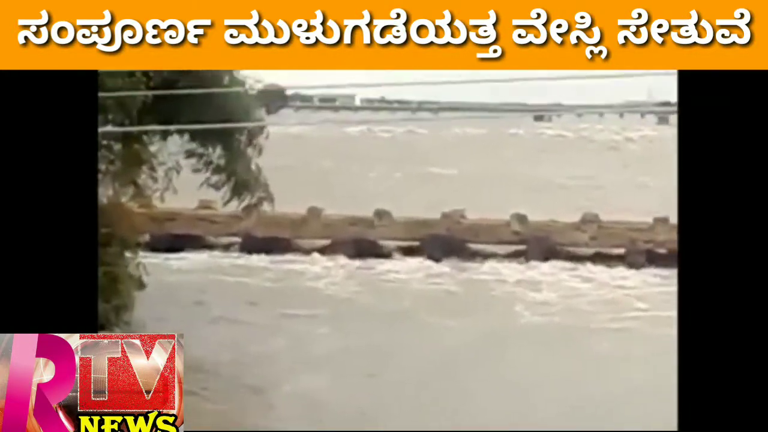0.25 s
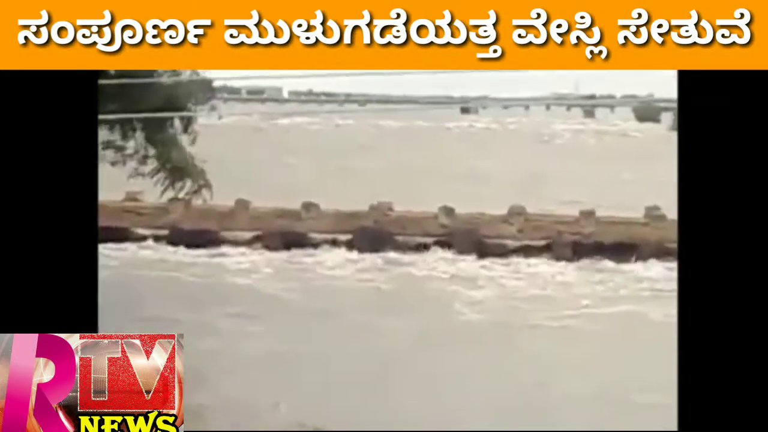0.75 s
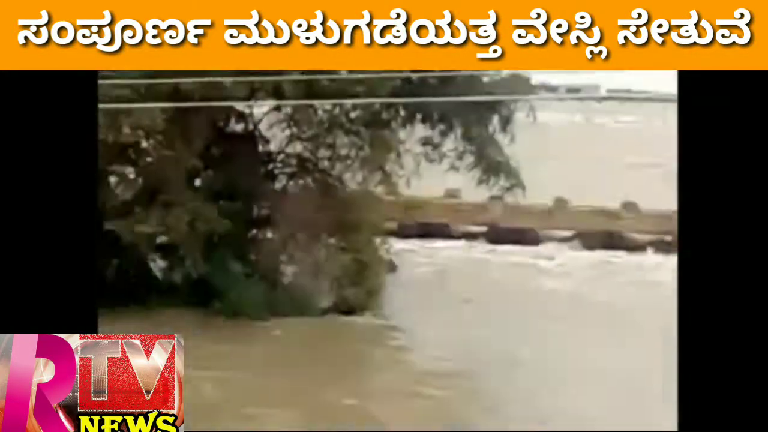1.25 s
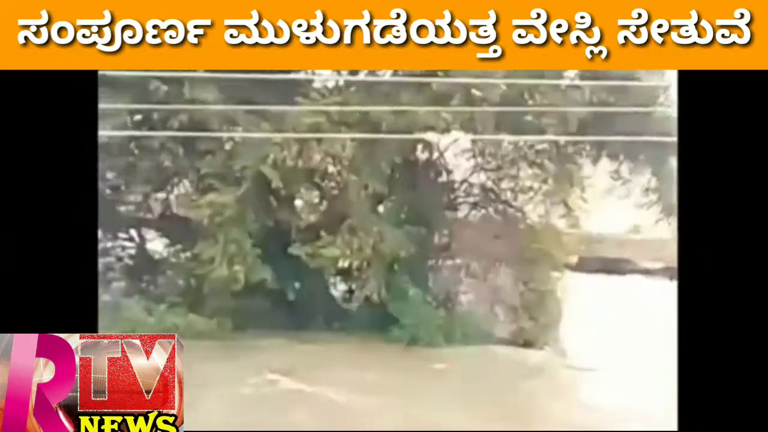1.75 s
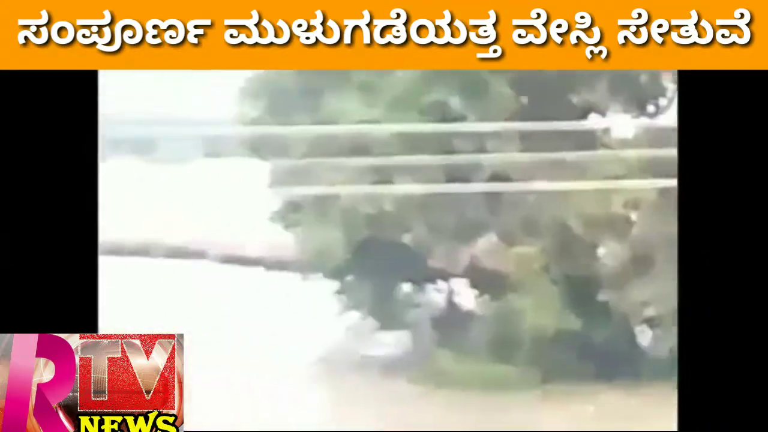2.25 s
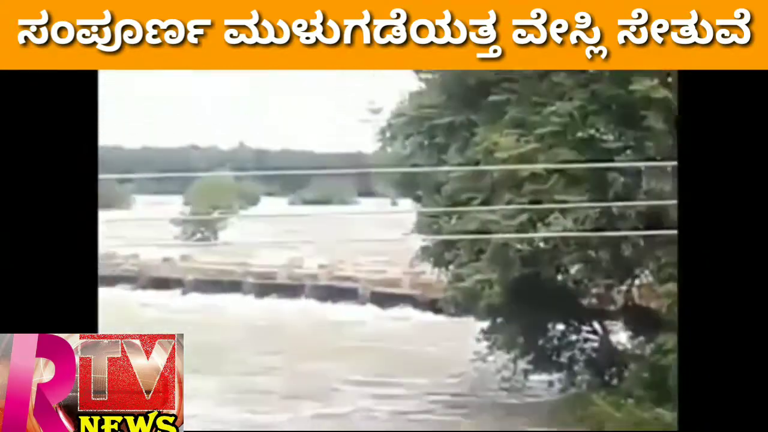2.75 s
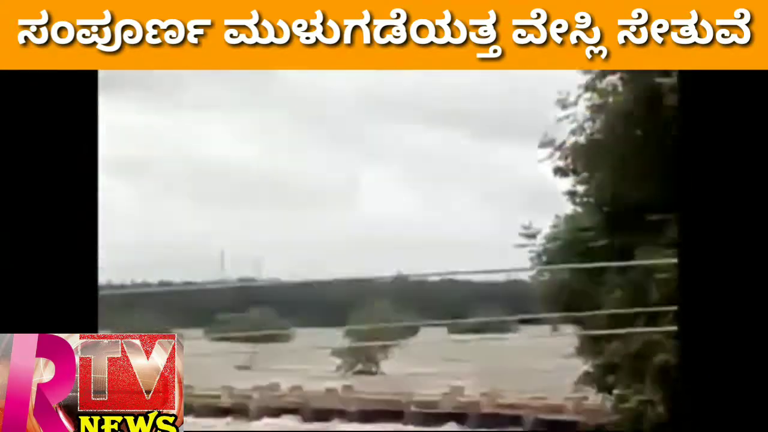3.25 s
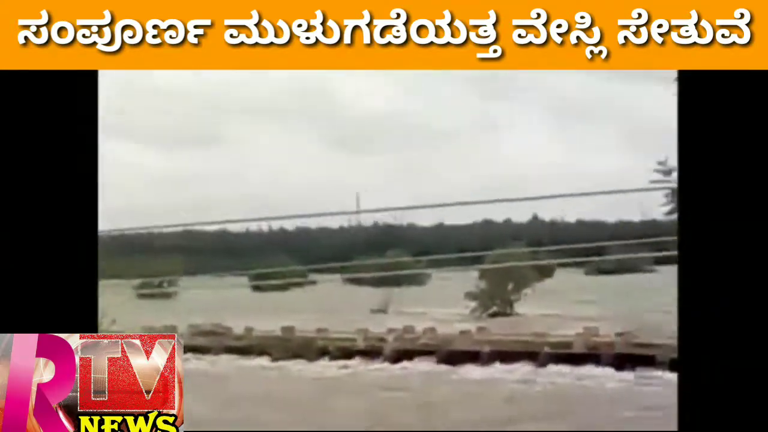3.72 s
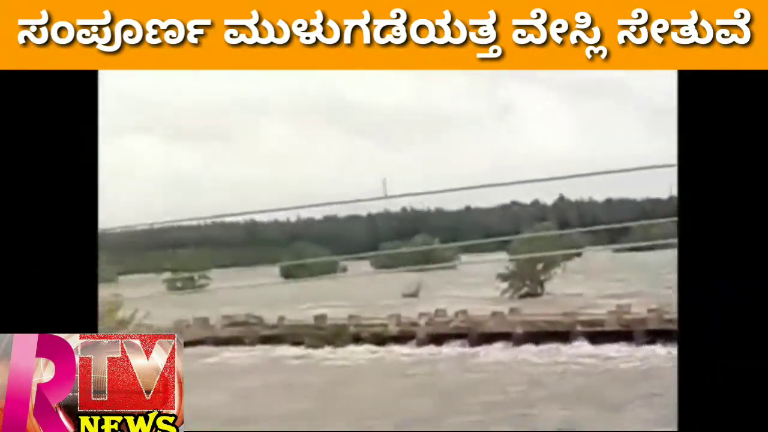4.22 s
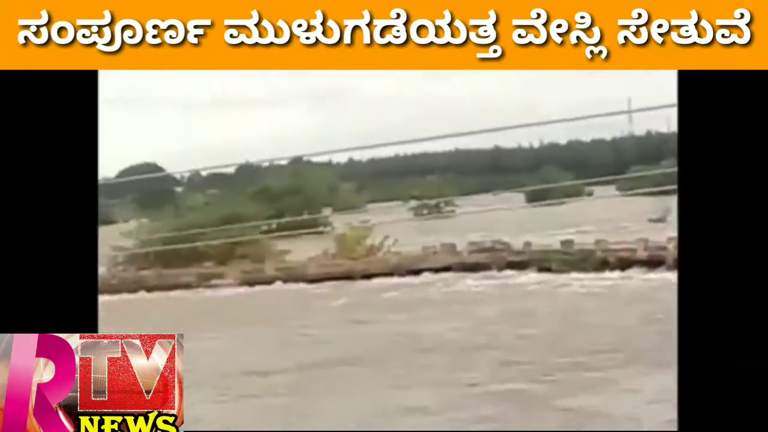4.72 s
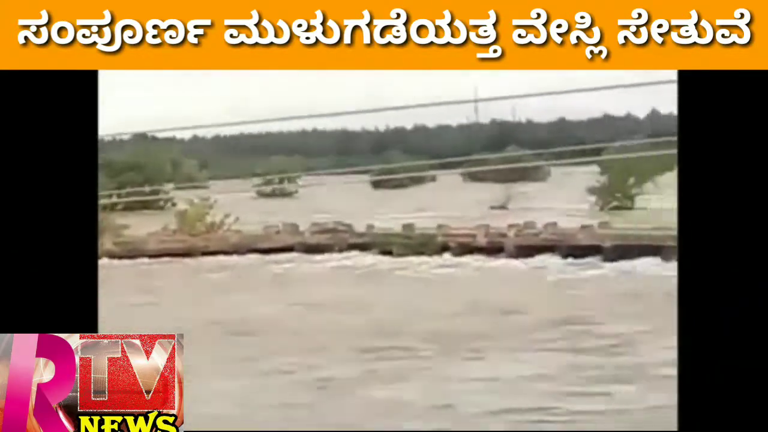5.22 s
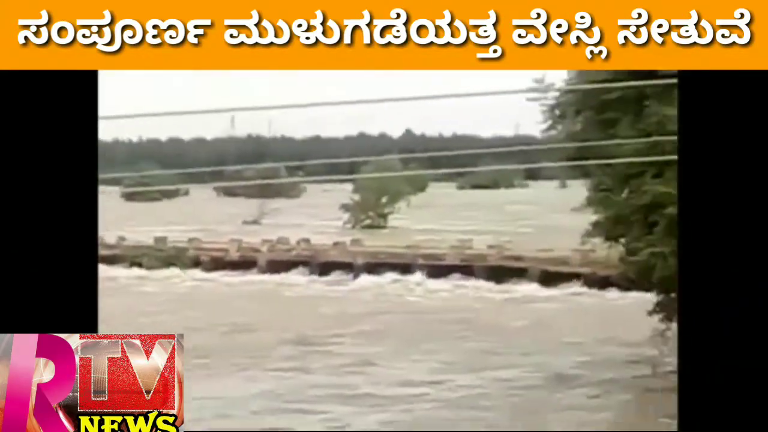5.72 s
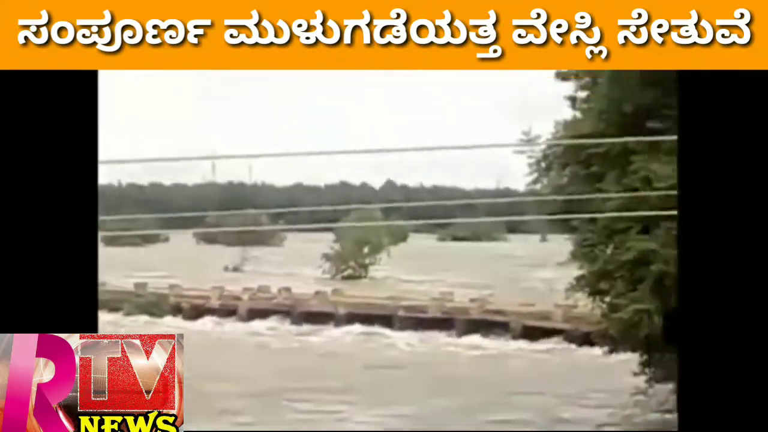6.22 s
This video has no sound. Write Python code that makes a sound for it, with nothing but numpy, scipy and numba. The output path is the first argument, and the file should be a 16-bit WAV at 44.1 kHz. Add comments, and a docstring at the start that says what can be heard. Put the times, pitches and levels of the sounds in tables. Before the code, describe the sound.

A steady, burbling rush of river water, opening with rough wind slaps, then a slow single-cylinder engine putters until a small double click.

```python
"""A flooded river roars past a low bridge throughout: noise bands that burble, with splashes and ringing bubbles.
For the first second a hard gust of lumpy low noise batters the microphone port with rough slaps of air, with
very faint high bursts near 12 kHz and a thin hiss. Then the wind eases to loose low swells and fewer slaps,
and a single-cylinder engine idles at about ten thumps a second, each a short low swing that climbs in pitch.
Three broader faint ticks fall early on, a louder double click near the end; gain control ducks loud moments."""
import sys
import numpy as np
from scipy import signal
from scipy.fft import rfft, irfft, next_fast_len
from scipy.io import wavfile
from scipy.ndimage import uniform_filter1d
from numba import njit

SR = 44100
rng = np.random.default_rng(int(sys.argv[2]) if len(sys.argv) > 2 else 0)


def wav_out(sig):
    """Save sig, one row per channel (or a flat mono array), as 16-bit PCM at SR to the path in sys.argv[1]."""
    wavfile.write(sys.argv[1], SR, np.round(np.clip(np.atleast_2d(sig).T, -1, 1) * 32767).astype(np.int16))


N = 285346

# Hard opening gust on the port. Each row: time in seconds, wind strength in dB,
# level of the rasp against the low noise in dB.
GUST_LEVELS = [(0.0, -25.5, -5.5), (0.03, -15.5, -4), (.065, -22, -9.5), (.1, -21, -0.5),
               (0.16, -13.5, -10), (0.205, -23.5, -17), (.25, -19.5, -14), (0.30, -13.5, -16),
               (.345, -18.5, -10.5), (.41, -17.5, -12.5), (.45, -23, -8), (.5, -17.5, -10.5),
               (.55, -22.5, -5), (.6, -23.5, -2), (0.64, -18.5, -7), (.69, -26, -14), (.715, -35, -10),
               (0.74, -38, 1), (0.80, -14.5, -15), (.825, -28.5, -13), (.85, -19, -8), (0.9, -46, -21)]
# The lighter breeze after it. Each row: time in seconds, wind strength in dB,
# level of the rasp against the low noise in dB.
BREEZE_LEVELS = [(1.45, -40, -22), (1.9, -36.5, -14), (2.3, -26, -23), (2.6, -28, -29), (3.1, -30.5, -12),
                 (3.4, -32, -15), (4.2, -36, -13.5), (5.2, -43, -10), (5.7, -33, -14), (6.47, -53, -11)]


def undb(db):
    """Decibels to gain."""
    return 10 ** (np.asarray(db) / 20)


def level(x, db):
    """Scale to an rms level in dB."""
    return x * undb(db) / np.sqrt(np.mean(x ** 2))


def curve(table):
    """Columns of a table joined by straight lines in time."""
    s, *columns = np.transpose(table)
    return [np.interp(np.arange(N) / SR, s, c) for c in columns]


def add(out, s, x):
    """Mix a short sound in at s seconds."""
    i = int(s * SR)
    out[i:i + len(x)] += x[:N - i]


def walk(rate):
    """Random levels, each held for 1 / rate seconds, then smoothed twice."""
    k = int(SR / rate)
    steps = np.repeat(rng.standard_normal(N // k + 1), k)
    return 0.66 * uniform_filter1d(uniform_filter1d(steps, k), k)[:N]


@njit
def svf(x, hz, damp):
    """State-variable filter with a moving centre: (low-pass, band-pass of gain 1)."""
    low, band, b, l = np.empty(len(x)), np.empty(len(x)), 0., 0.
    for i in range(len(x)):
        g = np.tan(np.pi * hz[i] / SR)
        v = (b + g * (x[i] - l)) / (1 + g * (g + damp))
        low[i], band[i] = l + g * v, damp * v
        b, l = 2 * v - b, l + 2 * g * v
    return low, band


@njit
def follow(x, attack, release):
    """Envelope that rises quickly and falls slowly."""
    out, e = np.empty(len(x)), 0.
    for i in range(len(x)):
        e += (abs(x[i]) - e) * (attack if abs(x[i]) > e else release)
        out[i] = e
    return out


def river():
    """Countless far-off splashes merge: quarter-octave bands burble together, surge in groups and flicker alone."""
    # Level of the roar, dipping briefly at 0.315 s. Each row: time in seconds, roar level in dB,
    # spray (about 5 kHz up) in dB.
    roar_levels = [(0, -42.5, 0), (.12, -46, 1.5), (.27, -42, 2), (.315, -52, 3), (.37, -41, 2),
                   (.7, -41, 1.5), (1.3, -40.5, 1), (1.65, -40.5, 2.5), (1.9, -40, 6), (2.15, -40.5, 3),
                   (2.33, -40, 6.5), (2.42, -40, 4.5), (2.53, -40.5, 5.5), (2.8, -40.5, 1.5),
                   (3.1, -41, 5.5), (3.4, -40.5, 2), (4, -41.5, 1.5), (5.3, -41, 2), (6.47, -41.5, 2)]
    # Colour of the roar. Each row: frequency in Hz, relative density in dB per Hz.
    roar_colour = [(25, -16), (50, -17), (75, -9.5), (100, -4.5), (200, -7), (260, -11.5), (350, -12.5),
                   (450, -14), (560, -13), (950, -18), (1300, -17), (1750, -19), (2120, -20), (2400, -25),
                   (2800, -28), (3300, -30.5), (4200, -31.5), (5000, -37), (5800, -38), (6500, -41),
                   (8200, -62.5), (11700, -72), (14000, -68), (14900, -59.5)]
    # A faint narrow hiss early on. Each row: time in seconds, level in dB before it flickers.
    sheen_levels = [(.3, -67), (.45, -60), (.62, -59), (.8, -71), (1.0, -58), (1.2, -70), (1.5, -75)]
    sheen_hz, sheen_width_hz = 3870, 250
    surge_db, patch_db = 1, 0.5  # neighbours surging together; each band swelling alone
    spray_low_share = 0.24  # the band just under 5 kHz swings less

    roar_db, spray_db = curve(roar_levels)
    hiss_db = -2 + 1.45 * spray_db  # the top hiss swings further than the spray

    size = next_fast_len(N)
    f = np.maximum(np.fft.rfftfreq(size, 1 / SR), 1)
    hz, db = np.transpose(roar_colour)
    colour = rfft(rng.standard_normal(size)) * undb(np.interp(np.log(f), np.log(hz), db))
    colour /= np.std(irfft(colour * (f > 1500) * (f < 2500), size))  # the roar level refers to this range

    place = 4 * np.log2(f / 25)  # quarter octaves above 25 Hz
    out = 0
    burble_db = 1.14 * walk(32) + 0.8 * walk(19)
    surge = walk(26)
    for k in range(38):
        band = irfft(colour * np.clip(1 - abs(place - k), 0, 1), size)[:N]
        if k > 33:
            extra_db = hiss_db
        elif k > 30:
            extra_db = spray_db
        elif k > 27:
            extra_db = spray_low_share * spray_db
        else:
            extra_db = 0
        flicker_db = (2.4 if k > 32 else 1.2) * walk(30)
        surge = .8 * surge + .6 * walk(24)  # partly shared with the band below
        swell_db = surge_db * surge + patch_db * walk(18)
        out = out + band * undb(extra_db + burble_db + flicker_db + swell_db)

    sheen = svf(rng.standard_normal(N), np.full(N, 1. * sheen_hz), sheen_width_hz / sheen_hz)[1]
    sheen_db = curve(sheen_levels)[0] + 2.6 * walk(13)
    return out * undb(roar_db) + level(sheen, 0) * undb(sheen_db)


def splashes():
    """Nearer splashes: short swells of noise, each in its own broad band."""
    per_s, low_hz, octaves = 30, 880, 1.7
    peak_s = 0.018  # time to the top of the swell
    top_db, spread_db, db_per_octave = -48, 8, -4  # level of the noise before the swell shapes it
    out, t = np.zeros(N), np.arange(SR // 6) / SR
    swell = t / peak_s * np.exp(1 - t / peak_s)
    for when, size, luck in rng.random((int(per_s * N / SR), 3)):
        octave = octaves * size
        hz = np.full(len(t), low_hz * 2 ** octave)
        hiss = svf(svf(rng.standard_normal(len(t)), hz, 0.31)[1], hz, .7)[1]
        db = top_db + db_per_octave * octave - spread_db * luck
        add(out, when * N / SR, swell * level(hiss, db))
    return out


def bubbles():
    """Trapped air rings briefly as it bursts, rising a little in pitch; small bubbles tend to be fainter."""
    per_s, low_hz, octaves = 260, 422, 3.0
    cycles, rise = 47, 0.018  # length in cycles of the starting pitch; pitch ends higher by twice the rise
    top_db, spread_db, db_per_octave = -43, 7, -3.5
    out = np.zeros(N)
    for when, size, luck in rng.random((int(per_s * N / SR), 3)):
        octave = octaves * size
        hz = low_hz * 2 ** octave
        turns = np.arange(int(cycles * SR / low_hz / 2 ** octave)) * hz / SR
        db = top_db + db_per_octave * octave - spread_db * luck
        ring = np.sin(2 * np.pi * turns * (1 + rise * turns / cycles))
        shape = np.sin(np.pi * np.sqrt(turns / cycles)) ** 2  # quick rise, slower fall
        add(out, when * N / SR, undb(db) * ring * shape)
    return out


def ticks():
    """Brief noise bursts in broad resonances: one for a faint burst, several for each half of the double click."""
    # Very faint, high bursts near 12 kHz, then three broader faint ticks.
    # Each row: start in seconds, peak in dB, pitch in Hz, width in Hz.
    faint_bursts = [(.012, -65, 12200, 1500), (.1311, -64, 12000, 1500), (.2708, -56, 12100, 2000),
                    (0.291, -47, 12100, 1500), (.3905, -59, 11900, 2000), (0.95, -46, 8940, 9500),
                    (1.405, -45.5, 11000, 9500), (2.3111, -45, 8500, 9500)]
    # The louder double click. Each row: start in seconds, peak in dB (reference for its resonances).
    clicks = [(6.0096, -18.5), (6.0139, -29)]
    # Resonances of each click. Each row: pitch in Hz, width in Hz, peak against the click in dB,
    # decay setting in seconds.
    click_rings = [(1560, 880, -8, 0.011), (2600, 900, -14, .009), (4600, 7200, -14, .008),
                   (5000, 1600, -9, 0.009), (3900, 1000, -2.5, 0.015), (6300, 1200, -4.5, 0.016),
                   (9900, 4200, -24, 0.013), (14700, 3000, -20, 0.008)]
    faint_decay_s = 0.0052

    out, t = np.zeros(N), np.arange(SR // 20) / SR
    rings = [(*row, faint_decay_s) for row in faint_bursts]
    for s, db in clicks:
        for hz, width_hz, ring_db, decay_s in click_rings:
            rings.append((s, db + ring_db, hz, width_hz, decay_s))
    for s, db, hz, width_hz, decay_s in rings:
        # the decay factor alone falls 84 dB in decay_s
        burst = rng.standard_normal(len(t)) * t * np.exp(-1.4 * np.log(1000) * t / decay_s)
        for _ in range(3):
            burst = svf(burst, np.full(len(t), 1. * hz), width_hz / hz)[1]
        add(out, s, undb(db) * burst / abs(burst).max())
    return out


def engine(rise_s=0.0029, fall_s=.005, climb_per_s=10.0, middle_s=0.019, tail_db=-18, tail_s=0.012):
    """Each firing rings the silencer for a few swings that climb in pitch, then dies off."""
    # Exhaust thumps, some firings weak or missed. Each row: start in seconds,
    # level in dB of the body's peak, length in seconds.
    firings = [(.882, -24, 0.044), (0.985, -19, 0.023), (1.09, -20, 0.024), (1.197, -20.5, 0.013),
               (1.293, -20.5, 0.025), (1.392, -24.5, 0.014), (1.495, -37, 0.025), (1.586, -18.5, 0.017),
               (1.682, -21.5, 0.039), (1.77, -21.5, 0.033), (1.885, -24, 0.038), (1.978, -21.5, 0.036),
               (2.074, -25, 0.019), (2.178, -20.5, 0.047), (2.275, -26, 0.028), (2.37, -16.5, 0.031),
               (2.572, -26.5, 0.039), (2.78, -20, 0.032), (2.87, -26, 0.03), (2.981, -20, 0.03),
               (3.077, -21, 0.034), (3.183, -24, 0.041), (3.285, -18, 0.02), (3.401, -24, 0.049),
               (3.504, -20.5, 0.044), (3.607, -17, 0.021), (3.702, -21, 0.034), (3.804, -21, 0.034),
               (3.902, -26.5, 0.037), (4.006, -19.5, 0.037), (4.093, -19, 0.043), (4.197, -26.5, 0.072),
               (4.27, -19, 0.047), (4.374, -24.5, 0.04), (4.469, -18, 0.042), (4.565, -29, 0.027),
               (4.656, -23.5, 0.056), (4.759, -30, 0.041), (4.845, -17.5, 0.049), (4.945, -20, 0.0075),
               (5.04, -16.5, 0.038), (5.137, -28.5, 0.055), (5.227, -18.5, 0.037), (5.32, -25.5, 0.022),
               (5.412, -18.5, 0.045), (5.518, -28.5, 0.037), (5.614, -16, 0.023), (5.715, -19, 0.027),
               (5.812, -20, 0.042), (5.911, -24, 0.019), (6.018, -20.5, 0.033), (6.13, -26, 0.05),
               (6.248, -25, 0.014), (6.407, -32, 0.024)]
    silencer_hz, scatter = 136.7, 0.011  # pitch at middle_s; relative spread between firings
    out, t = np.zeros(N), np.arange(SR // 8) / SR
    tail = undb(tail_db) * (t / tail_s) * np.exp(1 - t / tail_s)
    for (s, db, hold_s), (turn, off) in zip(firings, rng.standard_normal((len(firings), 2))):
        attack = 1 - np.exp(-t / rise_s)
        release = 1 + np.exp((t - hold_s) / fall_s)
        body = attack * np.exp(-t / .11) / release
        shape = body / body.max() + tail
        climb = climb_per_s * (np.minimum(t, hold_s) - middle_s)
        pitch = silencer_hz * (1 + scatter * off + climb)
        phase = 2 * np.pi * np.cumsum(pitch) / SR + 0.38 * turn
        add(out, s, undb(db) * shape * np.sin(phase))
    return out


def strength():
    """Level of the low noise in dB: each swell rises, then drops away faster, down to the steady air."""
    # Low swells of noise: wind buffets, some merging with the deep part of an engine thump.
    # Each row: time of the top in seconds, strength there in dB.
    low_swells = [(.99, -32), (1.42, -28), (1.59, -38), (1.86, -28), (2.06, -26), (2.36, -26),
                  (2.52, -22.5), (2.86, -21), (2.98, -19), (3.26, -23.5), (3.65, -24), (3.81, -28),
                  (4.04, -28.5), (4.29, -27.5), (4.55, -27), (4.67, -25.5), (4.87, -24.5), (5.09, -32),
                  (5.44, -24.5), (6.04, -28), (6.13, -30.5), (6.25, -30)]
    rise_db_per_s, fall_db_per_s = 172, 257.5
    db, t = curve(GUST_LEVELS + BREEZE_LEVELS)[0], np.arange(N) / SR
    for s, top_db in low_swells:
        drop_db = np.where(t < s, rise_db_per_s * (s - t), fall_db_per_s * (t - s))
        db = np.maximum(db, top_db - drop_db)
    return db


def wind(gusty_db=8.0, gust_hz=127.0, breeze_hz=103.0, rasp_hz=342.0, deep_hz=53.0):
    """Eddies shed over the port: lumpy low noise, with a rasp riding on the same lumps."""
    pointed = 0.09  # pressure crests come out sharper than troughs
    db, rasp_db = strength(), curve(GUST_LEVELS + BREEZE_LEVELS)[1]
    in_gust = np.arange(N) < GUST_LEVELS[-1][0] * SR
    hz = np.where(in_gust, gust_hz, breeze_hz)  # faster air, smaller eddies

    lumps = undb(gusty_db * walk(50))
    lumps /= np.sqrt(uniform_filter1d(lumps ** 2, SR // 12))  # keep only the quick lumps

    low = svf(svf(rng.standard_normal(N), hz, 0.83)[0], 2.61 * hz, 0.68)[0]
    low = low - svf(low, np.where(hz > 110, 30., deep_hz), 1.4)[0]  # the port vents slow pressure
    low /= np.sqrt(uniform_filter1d(low ** 2, SR // 8))
    low = low + pointed * (low ** 2 - uniform_filter1d(low ** 2, SR // 40))

    rasp = svf(rng.standard_normal(N), np.full(N, rasp_hz), 0.83)[1]
    rasp = svf(rasp, np.full(N, 2.1 * rasp_hz), 2.4)[0]
    return lumps * undb(db) * (low + undb(rasp_db) * level(rasp, 0))


def slaps(crack_hz=340.0):
    """Each slap is a few swings of pressure with a rough crack on top."""
    # Sharp slaps of air. Each row: time in seconds (onset 4 ms before), level of the swings in dB, pitch in Hz,
    # crack against the swings in dB, top of the crack in octaves above 1 kHz.
    slap_rows = [(.015, -5.5, 119, -15.5, 0.63), (.023, -17, 203, -4, 0.84), (.036, -12.5, 202, -6, 0.74),
                 (.054, -15, 194, -3, .9), (.077, -15, 228, -6, .2), (0.08, -9.5, 181, -6.5, 0.092),
                 (.088, -13, 202, -4.5, 1.5), (.094, -14, 172, -5.5, 1.55), (.111, -15, 174, -6, .4),
                 (.128, -14.5, 188, -11, 0.87), (0.14, -11, 193, -19, 0.28),
                 (.153, -7.5, 76.6, -12.5, 0.75), (.178, -14, 191, -9, -0.48), (.218, -12.5, 109, -16, -.5),
                 (.227, -16.5, 201, -5.5, .3), (0.243, -9, 120, -12, -.8), (0.265, -15, 110, -9, 0.014),
                 (.288, -5, 99, -10.5, -.1), (.316, -10, 109, -14.5, -0.31), (.373, -11, 170, -10, 0.33),
                 (.402, -14, 141, -14, .2), (.468, -12, 100, -15, -.2), (.505, -14.5, 150, -11, 0.49),
                 (0.587, -19, 188, -9, -.3), (.616, -17.5, 202, -7, 0.38), (.633, -12, 225, -13, -0.001),
                 (.651, -17, 150, -6, 0.27), (.67, -16, 200, -9, -.2), (0.697, -18, 160, -14, -0.52),
                 (.8, -10, 111, -10, 0.017), (.834, -17, 230, -2, -0.66), (0.849, -20, 170, -10, -0.51),
                 (.943, -22, 230, -15, -0.88), (1.43, -19, 120, -15, -0.39), (2.982, -16, 111, -18, -0.94),
                 (2.999, -18.5, 270, -8, -0.9), (3.012, -24.5, 260, -1, -0.53), (3.016, -11.5, 322, -5, .1),
                 (3.021, -14, 171, -6, -0.49), (3.128, -25, 130, -18, -.8), (3.249, -11.5, 95, -19, -0.67),
                 (3.64, -19.5, 198, -1.5, -0.054), (3.651, -27, 149, -5, -.6), (3.919, -21.5, 256, -7, -1),
                 (3.997, -17, 170, -4.5, -.4), (4.034, -20, 158, -8.5, -0.71),
                 (4.139, -24, 303, -11, -0.62), (4.17, -25, 150, -2.5, -0.95),
                 (4.223, -17.5, 200, -6.5, -0.58), (4.531, -24, 111, -5.5, -0.8),
                 (4.7, -24, 250, -14, -0.96), (5.44, -26.5, 205, -1, -0.49), (5.546, -21, 159, -9, -0.95),
                 (5.692, -22, 110, -8, -0.28), (5.762, -22.5, 261, -10, -0.28),
                 (5.769, -16.5, 141, -20, -1)]
    slap_s = 0.014
    sharpness, edge_db = 1.54, -13  # the crack is briefer than the swings and keeps a thin bright edge
    kink = 12.4  # sudden kick at the top of a slap, against noise of rms 1
    out, t = np.zeros(N), np.arange(SR // 20) / SR
    shape = np.sin(np.pi * np.clip(t / slap_s, 0, 1)) ** 2
    for s, db, hz, crack_db, octaves in slap_rows:
        top_hz = np.full(len(t), min(1000 * 2 ** octaves, SR / 4))
        push = rng.standard_normal(len(t))
        push[int(slap_s * SR / 2)] -= kink
        crack = svf(push, np.full(len(t), crack_hz), 0.72)[1]
        edge = svf(crack, top_hz, 1.5)[0]
        crack = svf(edge, top_hz, 1.5)[0] + undb(edge_db) * edge
        crack = crack * shape ** (sharpness - 1)
        balance = np.sqrt(np.sum(shape ** 2) / np.sum((shape * crack) ** 2))
        rough = crack * undb(crack_db) * balance
        swings = np.sin(2 * np.pi * hz * t)
        add(out, s - .004, undb(db) * shape * (swings + rough))
    return out


def scene():
    """All sources meet at one microphone."""
    return (river() + splashes() + bubbles() + wind() + slaps() + engine() + ticks())[None]


def record(dry, knee_db=-7, ratio=3.0, attack_s=.002, release_s=.06, bass_hz=50, top_hz=15150):
    """The microphone loses the deepest bass; gain control ducks under loud gusts; the top is cut."""
    x = signal.sosfilt(signal.butter(3, bass_hz, "high", fs=SR, output="sos"), dry)
    env = follow(x[0], 1 / (attack_s * SR), 1 / (release_s * SR))
    gain = np.minimum(1, undb(knee_db) / (env + 1e-9)) ** (1 - 1 / max(ratio, 1))
    return signal.sosfilt(signal.ellip(10, .2, 45, top_hz, fs=SR, output="sos"), x * gain)


dry = scene()
out = record(dry)
wav_out(out)
```